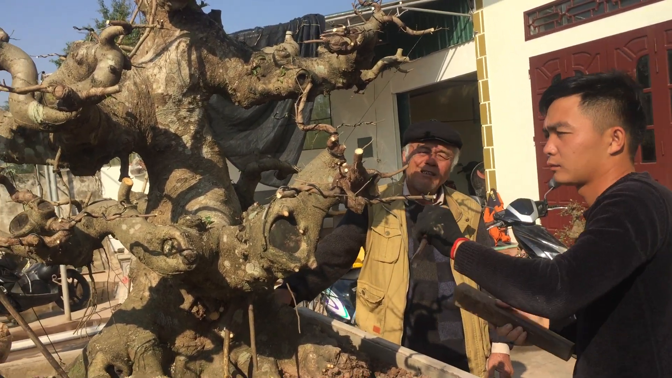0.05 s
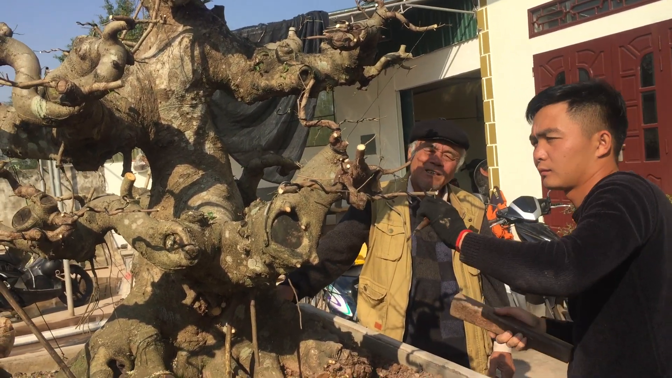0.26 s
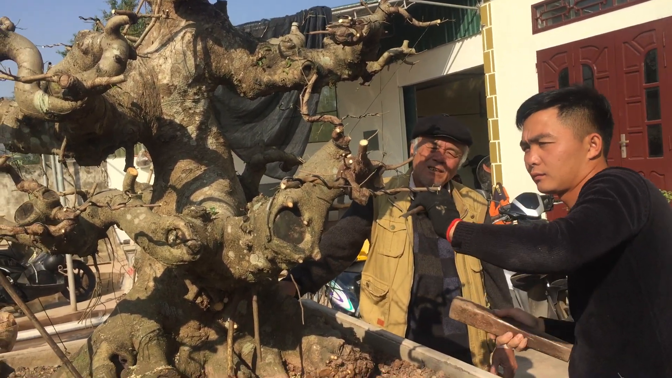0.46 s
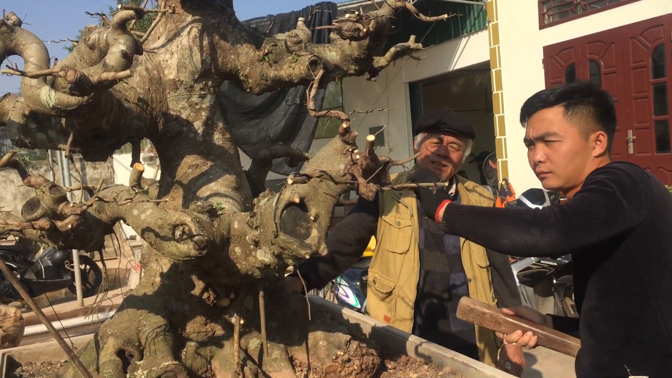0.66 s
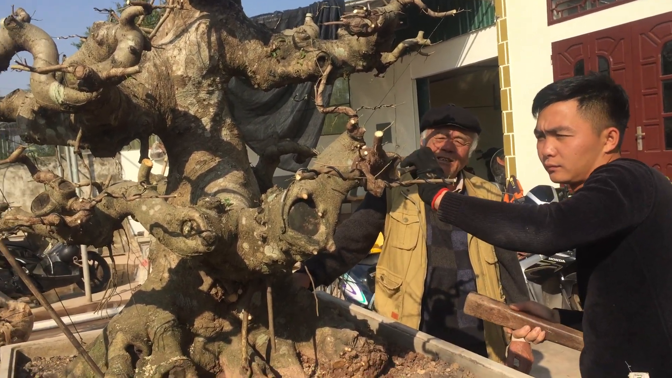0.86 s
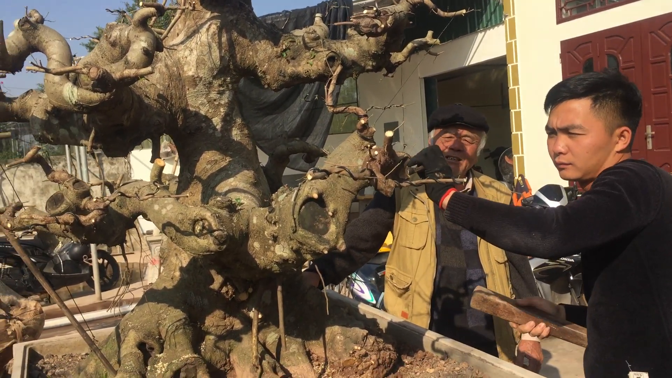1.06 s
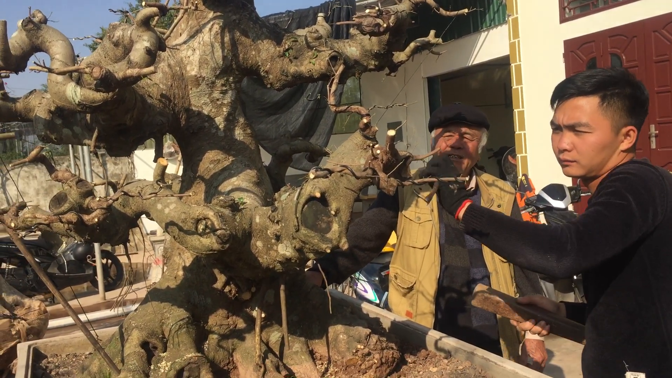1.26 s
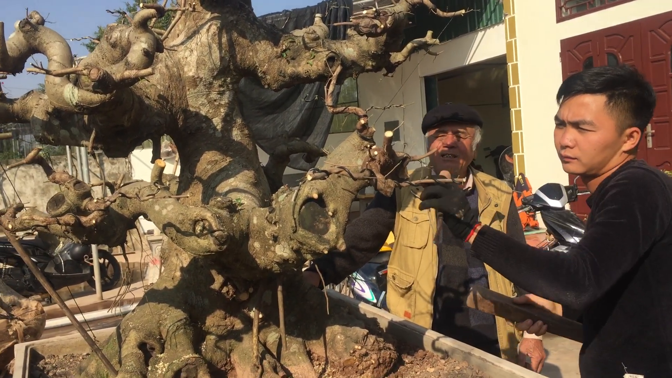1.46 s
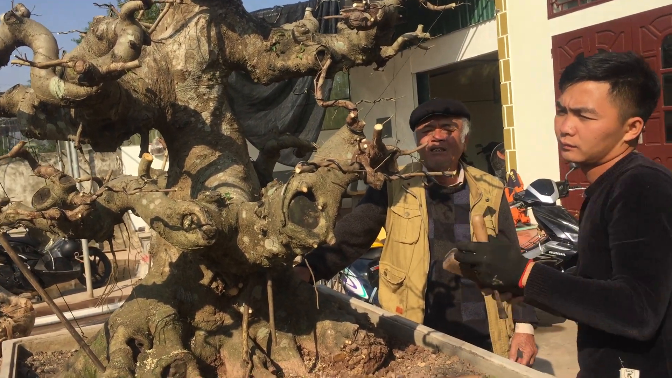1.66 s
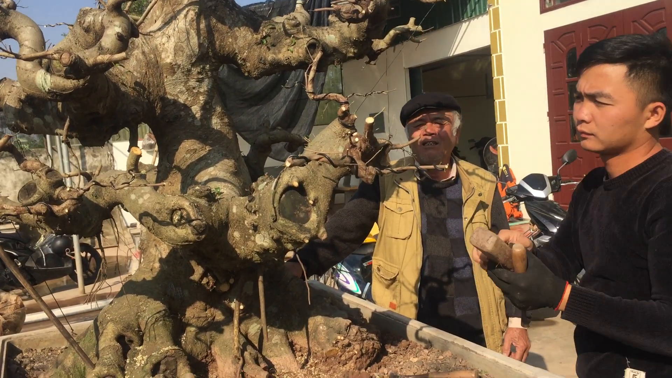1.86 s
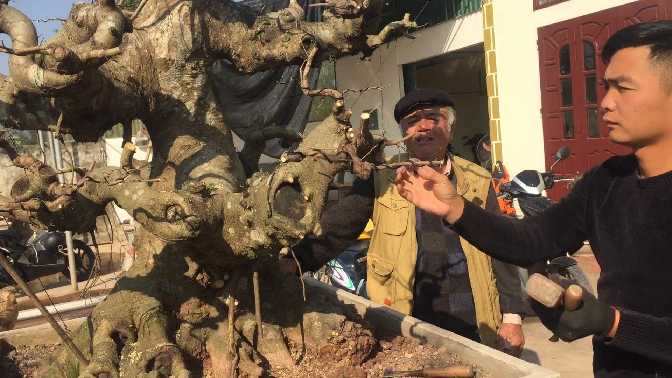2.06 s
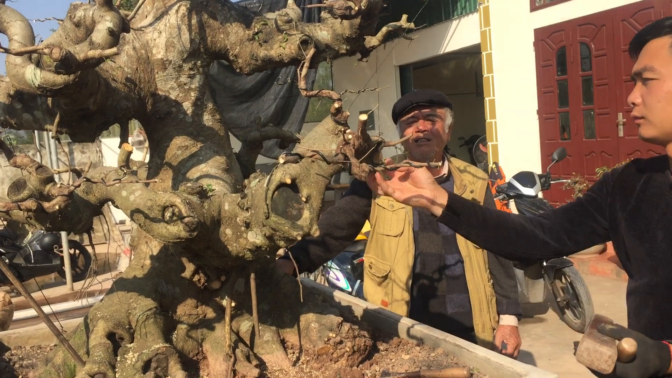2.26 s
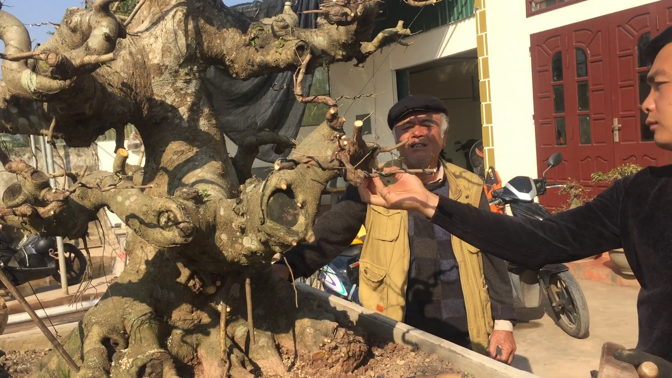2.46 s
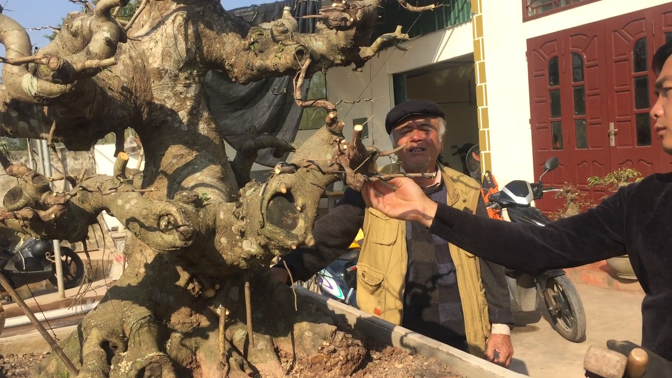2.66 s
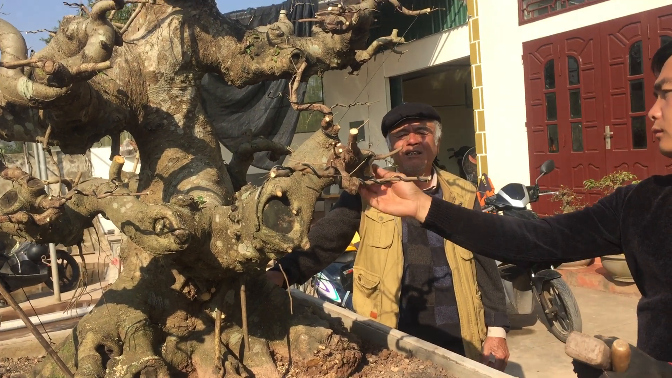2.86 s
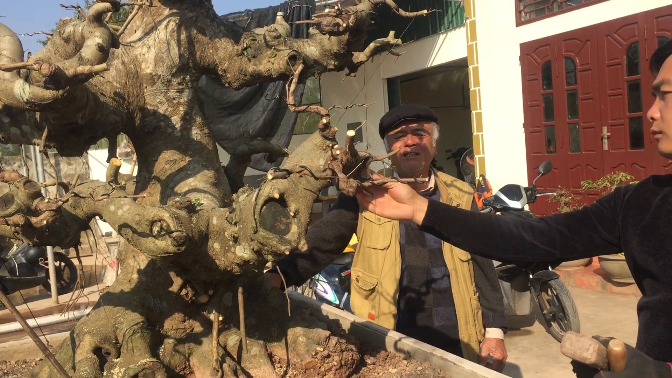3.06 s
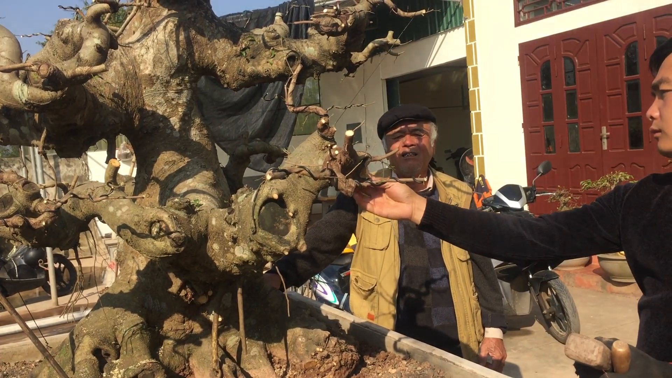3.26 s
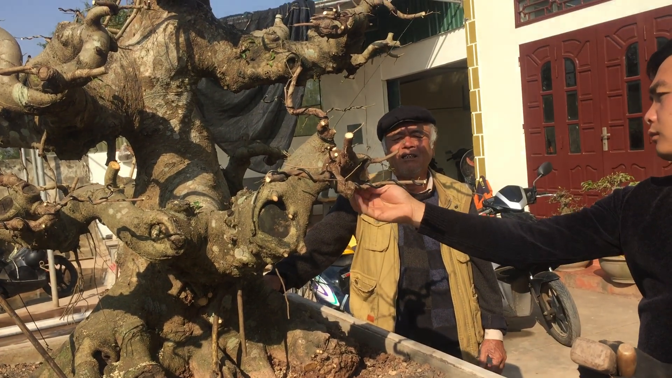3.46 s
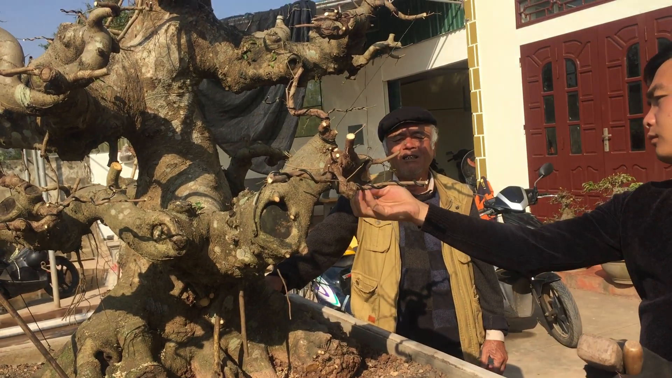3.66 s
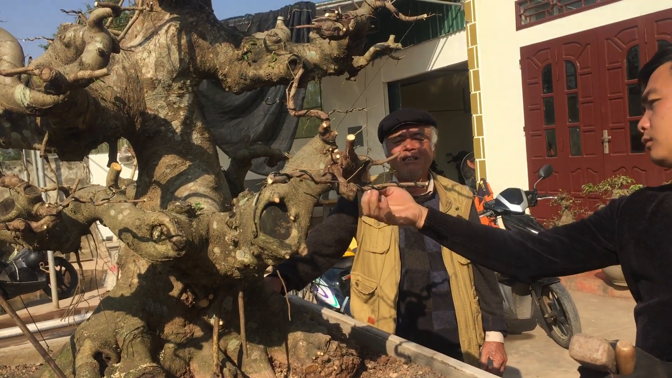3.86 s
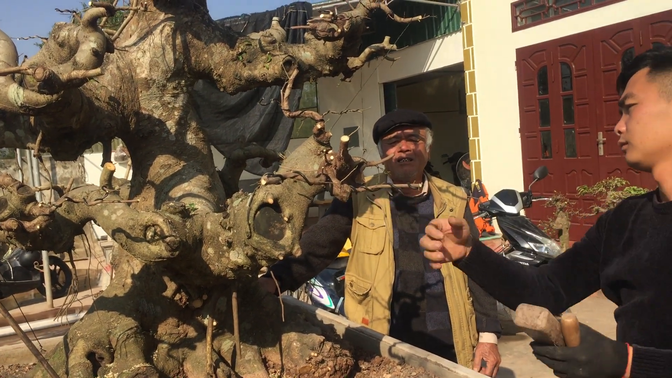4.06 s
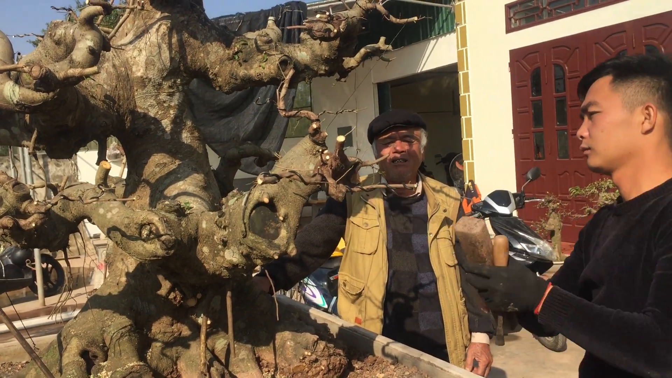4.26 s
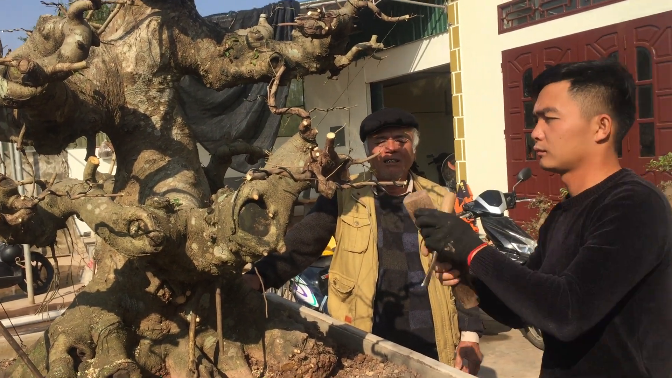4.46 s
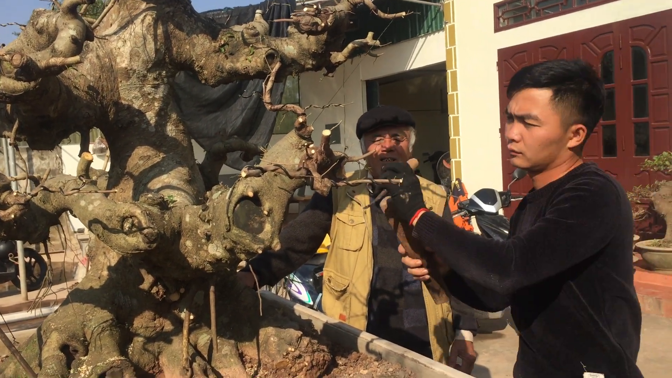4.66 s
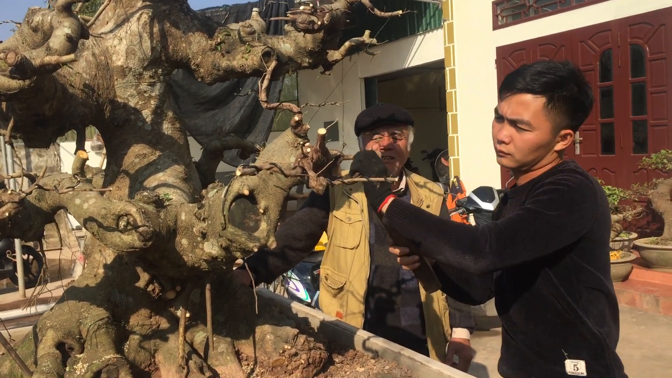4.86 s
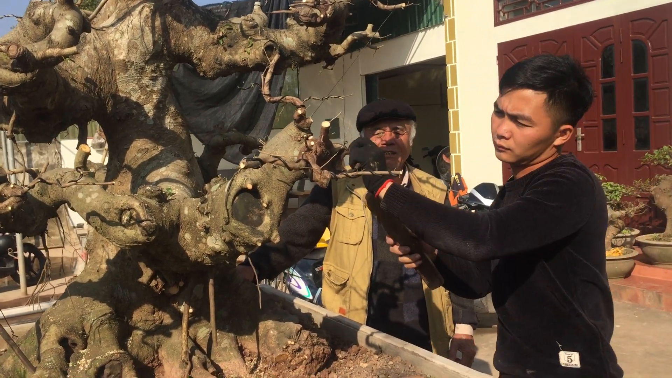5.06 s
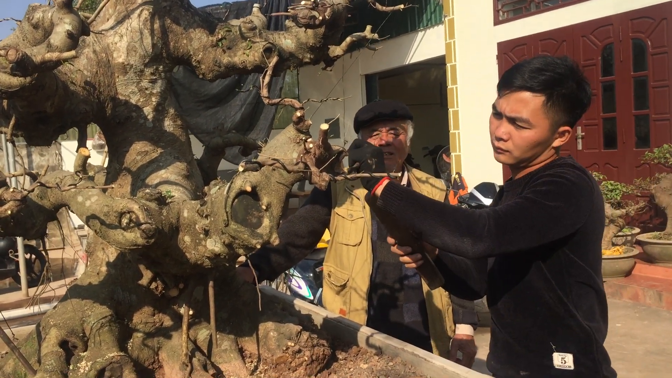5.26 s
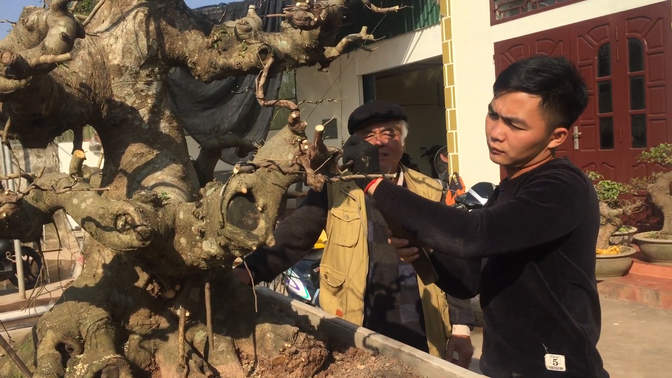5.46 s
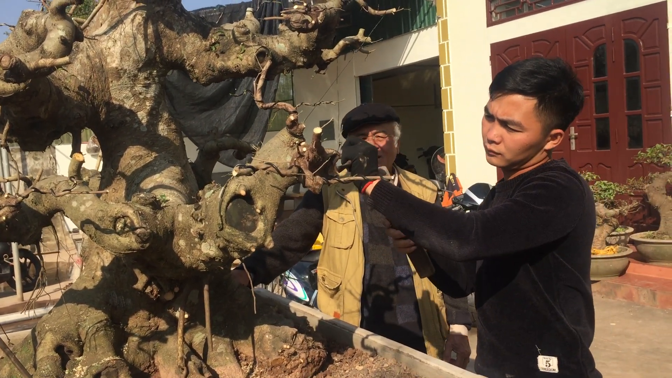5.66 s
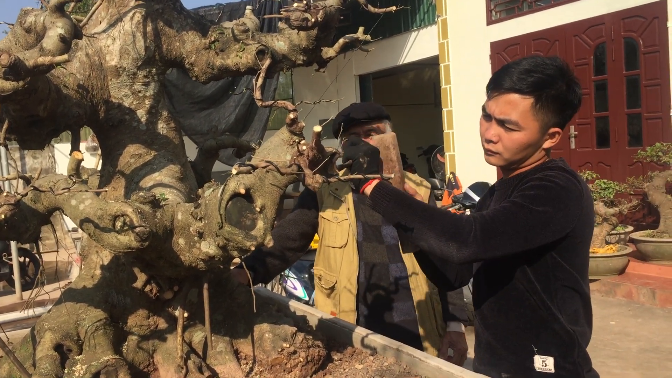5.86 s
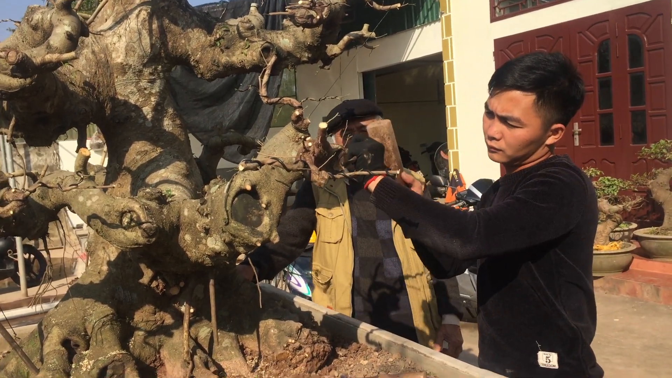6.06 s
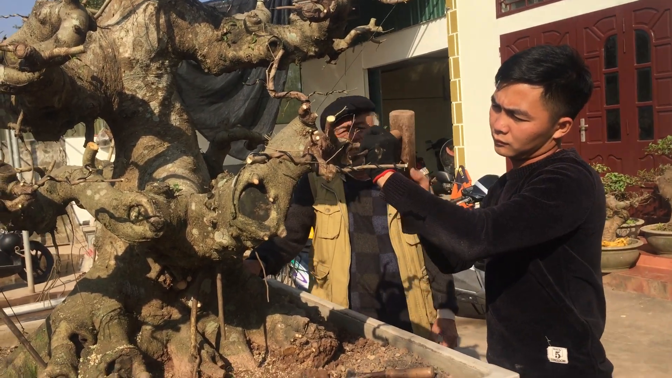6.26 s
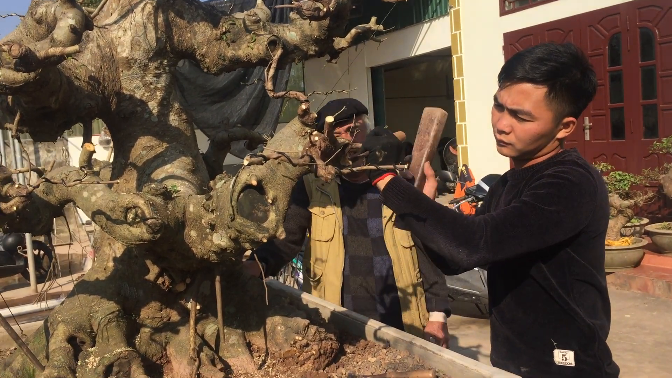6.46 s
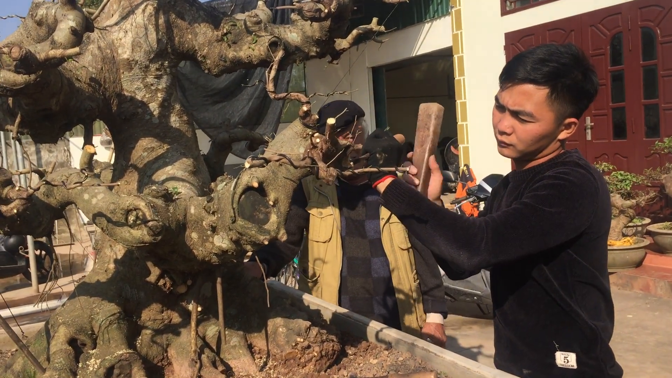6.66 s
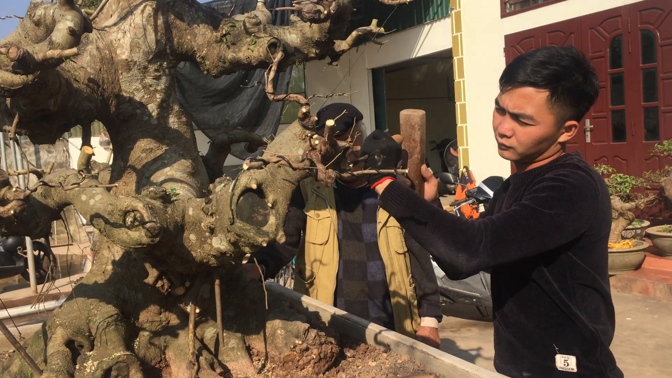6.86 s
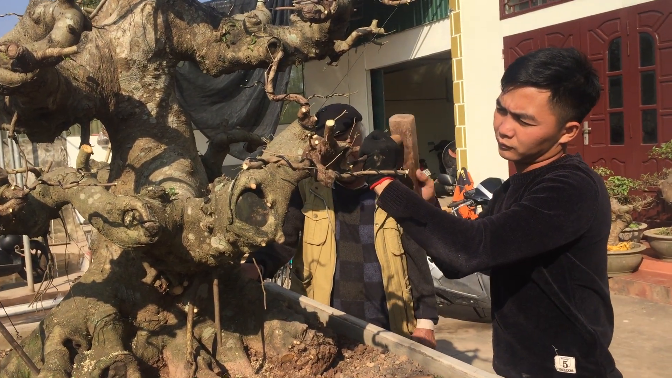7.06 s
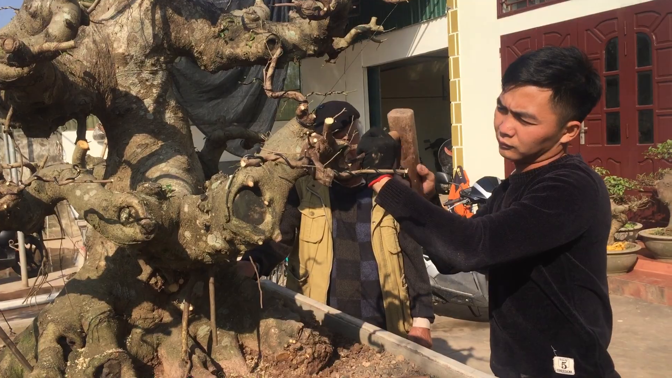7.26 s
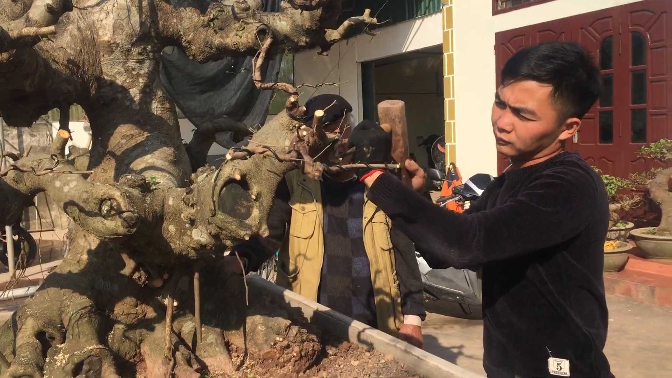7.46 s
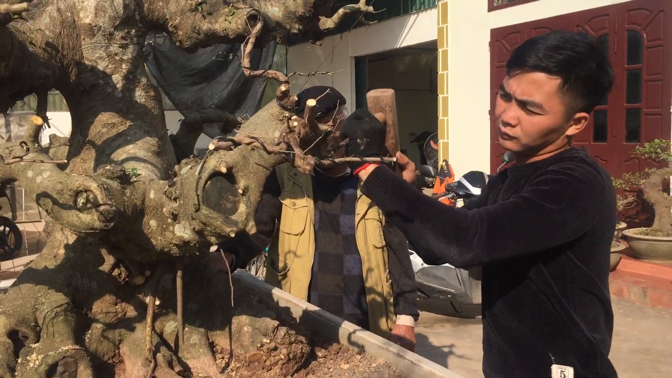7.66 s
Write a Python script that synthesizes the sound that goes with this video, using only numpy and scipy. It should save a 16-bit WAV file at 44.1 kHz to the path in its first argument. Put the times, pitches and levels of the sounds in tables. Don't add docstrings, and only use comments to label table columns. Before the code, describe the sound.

In a quiet paved yard, sleeves rustle and hands rub bark with tiny ticks and soft thuds, while a far bird peeps faintly. Mallet and chisel clack together once early on. More handling and faint wood squeaks follow, then near quiet, then seven sharp, dry wooden knocks in steady quick succession, the first softer. A small close microphone catches short wall echoes.

```python
import sys
import numpy as np
from scipy import signal
from scipy.fft import rfft, irfft
from scipy.io import wavfile
from scipy.ndimage import uniform_filter1d

SR = 44100
rng = np.random.default_rng(int(sys.argv[2]) if len(sys.argv) > 2 else 0)


def waveform_to_disk(signal):
    frames = np.transpose(np.atleast_2d(signal))
    scaled = np.clip(frames, -1, 1) * 32767
    samples = np.round(scaled).astype(np.int16)
    wavfile.write(sys.argv[1], SR, samples)


def volts(x):
    e = np.asarray(x, float) / 20
    return 10 ** e


N = 340143

# frequency in Hz, density in dB per Hz.
AIR_SPECTRUM = [(30, -7), (55, 4.5), (147, -7), (450, -9), (2700, -16), (11500, -24.5), (15200, -34),
                (16500, -43)]
# firmest moment in s, rise in s, fall in s, level in dB,
# level of the thin wood over the thick in dB.
RUBS = [(.172, 0.12, 0.24, -67.5, 9), (.408, 0.016, 0.19, -70.5, 14), (.572, 0.06, 0.075, -61.5, 4),
        (.844, 0.29, 0.18, -73.5, 6), (.97, 0.17, 0.22, -72, 3), (1.164, 0.058, 0.14, -67, 10),
        (1.436, 0.19, 0.48, -79, 8), (1.83, 0.26, 0.2, -65, -1), (1.885, 0.022, 0.1, -51.5, -1),
        (2.026, .007, 0.24, -68.5, 5), (2.235, 0.031, 0.055, -60.5, -0.5), (2.53, 0.01, 0.055, -55, -7),
        (2.58, 0.15, 0.084, -66, 9), (2.81, 0.026, 0.12, -61.5, 1.5), (3.24, 0.084, 0.056, -69, -6),
        (3.89, 0.13, 0.068, -55.5, 4), (4.03, 0.055, 0.13, -60, 4), (4.21, 0.19, 0.075, -56.5, -5.5),
        (4.5, 0.074, 0.12, -60.5, -6), (4.7, .04, 0.46, -74, 7), (4.84, 0.043, 0.33, -67.5, 5),
        (5.37, 0.068, 0.14, -75, 20), (5.7, 0.059, 0.19, -75, 19), (5.81, 0.12, 0.12, -78, -4)]
# firmest moment in s, rise in s, fall in s, level in dB,
# level of the finest grain over the coarser in dB.
RUSTLES = [(.005, 0.028, 0.74, -71, 1), (.172, 0.065, 0.16, -60, -1), (.408, 0.069, 0.17, -62.5, 0),
           (.666, 0.066, 0.13, -79.5, 14), (.754, .11, 0.093, -74.5, -13), (1.002, 0.03, 0.12, -72, -15),
           (1.2, .1, 0.18, -66.5, -5), (1.364, .3, 0.081, -71.5, 4), (1.752, 0.38, 0.47, -67, -3.5),
           (1.885, 0.032, 0.024, -66, 2), (2.026, 0.0091, 0.03, -55, -2), (2.24, 0.02, .04, -70, 11),
           (2.33, 0.098, 0.37, -75, 7), (2.53, 0.05, 0.16, -65, -1), (2.81, 0.1, 0.14, -64.5, 3.5),
           (3.22, 0.037, 0.054, -68.5, 15), (3.37, .13, 0.13, -69.5, 3), (3.89, 0.15, 0.069, -59.5, -12),
           (4.03, 0.082, 0.21, -69.5, -9), (4.21, 0.33, 0.071, -72, -7), (4.5, .16, 0.2, -69, -1),
           (4.7, 0.081, 0.34, -71, -4), (4.84, 0.067, 0.25, -61, -5.5), (5.72, 0.15, 0.36, -72.5, 6)]
# the eight pitches of one register in Hz, low register first.
RUBBED_PITCHES = [(1108, 1400, 1300, 1450, 1500, 1800, 1900, 2400),
                  (2814, 2560, 3400, 3300, 3000, 3760, 3600, 3900),
                  (4680, 5280, 6300, 6500, 5460, 4240, 4800, 6870),
                  (7460, 8300, 10300, 9150, 10000, 8940, 10640, 12600)]
RESTING_TOUCH_DB = (-78.5, -115, -82, -79)
# start in s, peak in dB, pitch in Hz,
# length of ring in cycles.
TICKS = [(0.1422, -40, 3620, 42), (0.408, -44, 3060, 9.8), (0.9944, -46, 3350, 7.1),
         (1.1448, -44.5, 4000, 8.7), (1.496, -48.5, 3280, 14), (1.634, -47, 3260, 11),
         (1.7799, -52, 3230, 8.5), (1.8094, -38, 3620, 14), (1.825, -40, 3630, 8.5),
         (2.0242, -40.5, 3250, 11), (2.0284, -49, 3300, 12), (2.2159, -57, 2840, 11),
         (2.5296, -44, 2900, 11), (2.5488, -36.5, 2920, 25), (2.802, -46, 3840, 8.5),
         (3.223, -48, 2290, 6.8), (4.6823, -42, 3870, 13), (4.7254, -43, 4060, 1.5),
         (4.836, -36.5, 4270, 16), (4.9353, -48, 3370, 8.5), (5.3208, -46.5, 4070, 16),
         (5.4919, -50, 5010, 14), (1.297, -50, 1800, 6.6), (.165, -45, 3900, 44), (.19, -43, 3680, 40),
         (1.125, -56, 3880, 40), (1.175, -47, 3880, 30), (4.783, -50, 3700, 8), (4.465, -65, 5770, 90),
         (2.222, -51, 1500, 8),
         (1.898, -41, 5340, 6.5),
    (1.907, -41, 5450, 5.3),
    (2.3136, -44.5, 11100, 9.7),
    (4.8365, -32.5, 6400, 3.8),
    (5.792, -45.5, 7400, 2.4),
    (1.029, -46, 6300, 12),
    (1.252, -45, 6750, 5.4),
    (1.325, -47.5, 7500, 8),
    (3.691, -47, 6400, 4.3),
]
# start in s, peak in dB, #
# pitch in Hz, length of ring in cycles.
THUDS = [(0.567, -35, 251, 19), (0.584, -34.5, 217, 12), (0.636, -49, 272, 10), (0.653, -59, 242, 12.5),
         (2.796, -54, 348, 28), (3.229, -53, 600, 36), (4.199, -53.5, 360, 24), (4.373, -61, 119, 8.5),
         (4.395, -53.5, 135, 8), (5.519, -58.5, 225, 37), (6.009, -50.5, 196, 11), (.41, -57, 93, 9.9),
         (.46, -66, 76.6, 9), (2.45, -58, 427, 31), (3.21, -48.5, 610, 19), (3.25, -52.5, 467, 28),
         (3.585, -58, 380, 25), (3.875, -55, 418, 32), (4.225, -50.5, 375, 19), (4.16, -55, 90, 10)]
# start in s, peak in dB, pitch in Hz, length of ring in cycles.
FLECKS = [
    (1.902, -50, 600, 12),
    (2.216, -51, 1450, 9),
    (3.878, -49, 2900, 40),
    (6.247, -58, 8500, 9),
    (6.405, -55, 9500, 9),
    (6.409, -57, 8000, 9),
    (6.581, -60, 9000, 9),
    (6.602, -56, 8300, 9),
    (6.612, -58, 9800, 14),
    (6.89, -53, 3500, 9),
]
# frequency in Hz, gain in dB.
YARD_COLOUR = [(45, 7), (200, 8.5), (350, 0), (600, -3), (1500, -0.5), (5000, -3.5), (9000, -8.5),
               (16000, -26)]
# start in s, length in s, pitch in Hz, level in dB.
PEEPS = [(0.581, 0.058, 3350, -71.5), (0.931, 0.054, 1710, -67.5), (0.959, 0.13, 3350, -65.5),
         (1.407, 0.13, 3330, -74), (1.467, 0.053, 3880, -78), (1.494, 0.027, 1304, -75),
         (1.561, 0.031, 1264, -72), (1.928, 0.098, 3170, -68), (2.03, 0.081, 1450, -69.5),
         (1.82, 0.035, 1460, -72), (2.345, .09, 3200, -79)]
# start in s, peak in dB.
CLACKS = [
    (1.89, -8.5),
]
# frequency in Hz, level in dB, decay time t60 in s.
TOOL_MODES = [(790, -12.5, 0.02), (1090, -13.5, 0.028), (1230, -4.5, 0.059), (1500, -6, 0.012),
              (1780, -1, 0.079), (1990, -0.5, 0.011), (2400, -5.5, 0.028), (2680, -7, 0.018),
              (3350, -12, 0.014), (4000, -9, 0.035), (4840, -11, 0.0063), (5800, -15, 0.0044)]
# start in s, length in s, pitch in Hz, level in dB.
SQUEAKS = [(3.815, .025, 3850, -73), (3.875, .05, 2150, -67), (4.01, .05, 5270, -74),
           (4.02, .08, 1950, -73), (4.025, .045, 3000, -69), (4.03, .07, 1400, -73),
           (4.045, .06, 3780, -74), (4.115, .04, 5450, -75), (4.155, .09, 2250, -71),
           (4.17, .098, 1150, -69), (4.46, .035, 5800, -73), (4.488, .045, 2760, -68),
           (6.0, .098, 860, -74)]
# start in s, peak in dB, then head, steel and trunk in dB against the handle modes.
BLOWS = [
    (6.1749, -17.5, -7.5, -14.5, -25.5),
    (6.4221, -15, -10, -9.5, -17),
    (6.658, -11, -16.5, -10, -16.5),
    (6.9125, -9.5, -12, -8, -16),
    (7.1395, -9.5, -15, -10.5, -16.5),
    (7.356, -9.5, -38, -6, -12.5),
    (7.5745, -9.5, -15, -5, -16),
]
# grip pitch in Hz, handle pitch in Hz, then grip, neck and split fibres in dB.
LANDINGS = [
    (1110, 1560, 1.6, -10, -18),
    (1060, 1760, 4.5, -17, -7.5),
    (925, 1655, -0.8, -17, -8),
    (963, 1690, 1.2, -6, 0.2),
    (990, 1700, -1.2, -22, -7),
    (1037, 1990, 6, 0.5, 1.7),
    (913, 1430, 0, -16, -0.2),
]
# delay of the kick in s, signed share of the blow, paving echo in dB.
KICKS = [
    (.0026, .1, -3),
    (.0026, .25, -7),
    (.0031, -.3, -6),
    (.0026, .35, -7),
    (.00245, .35, -8),
    (.0029, .3, -8),
    (.00256, -.3, -9),
]
# frequency in Hz, level in dB, decay time t60 in s.
HEAD_MODES = [(503, -17, 0.0085), (573, -1.5, 0.021), (594, 4, 0.017), (706, -4.5, 0.021)]
# frequency in Hz, level in dB, decay time t60 in s.
HANDLE_MODES = [(1450, -14, 0.035), (1598, 4, 0.014), (1710, 3.5, 0.024), (1742, 6, 0.024),
                (1970, 1, 0.0076), (2120, -13, 0.049)]
# frequency in Hz, level in dB, decay time t60 in s.
GRIP_MODES = [(990, 6, 0.012), (967, -4.5, 0.025), (1010, 0.5, 0.0068)]
# frequency in Hz, level in dB, decay time t60 in s.
NECK_MODES = [(1377, 5.5, 0.0088), (1350, -12, 0.012)]
# frequency in Hz, level in dB, decay time t60 in s.
STEEL_MODES = [(2185, 3, 0.01), (2490, 6, 0.0065), (2872, -8, 0.029), (2996, -3, 0.021), (3350, 9, 0.0068),
               (3796, -0.5, 0.016), (3990, -3.5, 0.0086), (4750, 1.5, 0.0043), (5500, -3, 0.01),
               (6560, -7, 0.0048)]
# frequency in Hz, level in dB, decay time t60 in s.
TRUNK_MODES = [(76.5, -15, 0.11), (103, -4, 0.06), (128.3, -5, 0.066), (159, -8.5, 0.052), (219, -3, 0.043),
               (294, 0, 0.038), (366, -7.5, 0.042)]
# frequency in Hz, width in Hz, gain in dB.
MICROPHONE_PORT = [(4000, 1000, 1.5), (4770, 1260, -4), (10300, 720, -8)]


def rms_one(x):
    return x / np.sqrt(np.mean(x ** 2) + 1e-20)


def peak_one(x):
    return x / np.abs(x).max()


def coloured(x, points):
    hz, level_db = np.transpose(points)
    grid = np.arange(len(x) // 2 + 1) * SR / len(x) + 1
    gain = volts(np.interp(np.log(grid), np.log(hz), level_db))
    return irfft(rfft(x) * gain, len(x))


def above(x, hz):
    return signal.sosfilt(signal.butter(4, hz, "high", fs=SR, output="sos"), x)


def ring(force, hz, t60):
    r = volts(-60 / (t60 * SR))
    w = 2 * np.pi * hz / SR
    return signal.lfilter([0, np.sin(w)], [1, -2 * r * np.cos(w), r * r], force + 1e-18)


def add(out, s, sound):
    i = round(s * SR)
    out[i:i + len(sound)] += sound[:N - i]


def air():
    level_db, breathing_db = -63, .7
    slow = rms_one(uniform_filter1d(rng.standard_normal(N), size=9000))
    return volts(level_db + breathing_db * slow) * rms_one(coloured(rng.standard_normal(N), AIR_SPECTRUM))


def strokes(rows):
    fall_db = 20
    blunt = 1.22
    t, power = np.arange(N // 40 + 2) * 40 / SR, 0
    for s, rise, fall, level_db, tilt_db in rows:
        shape_db = level_db - fall_db * np.maximum((s - t) / rise, (t - s) / fall) ** blunt
        power = power + volts(2 * (shape_db + tilt_db * np.array([[-.5], [.5]])))
    return [np.interp(np.arange(N) / SR, t, p) for p in power]


def brushing(per_s, size_db, cycles):
    sizes = volts(size_db * np.minimum(rng.exponential(1, N), 5)) * rng.choice([-1, 1], N)
    grains = sizes * (rng.random(N) < per_s / SR)
    dealt = rng.integers(0, 32, N)
    powers = strokes(RUBS) + strokes(RUSTLES)
    t, out = np.arange(N) / SR, np.zeros(N)
    for k, pitches in enumerate(RUBBED_PITCHES):
        touch_db = 6.7 * rng.standard_normal((len(pitches), 80))
        rings = np.zeros(N)
        for j, hz in enumerate(pitches):
            touch = volts(np.interp(t * 10, np.arange(80), touch_db[j]))
            rings += ring(grains * (dealt == 8 * k + j) * touch, hz, cycles[k] / hz)
        rings = above(rings, pitches[0] * .45)
        even = np.sqrt(uniform_filter1d(rings ** 2, size=6000) + 1e-12)
        out += np.sqrt(powers[k] + volts(2 * RESTING_TOUCH_DB[k])) * rings / even
    return out


def small_knocks(rows, trim_db, scratch, overtones):
    out, t = np.zeros(N), np.arange(SR // 5) / SR
    for s, peak_db, hz, cycles in rows:
        touch = (t == 0) + scratch * rng.standard_normal(len(t)) * np.exp(-t / 0.0068)
        rings = sum(share * ring(touch, min(hz * ratio, 15000), cycles / hz) for ratio, share in overtones)
        add(out, s, volts(peak_db + trim_db) * peak_one(above(rings, hz * 0.6)))
    return out


def ticks():
    overtones = ((1.04, 1), (1.1, 0.061), (1.11, 0.28), (1.86, 0.26), (2.73, 0.13))
    return small_knocks(TICKS, -3.9, 0.46, overtones)


def thuds():
    overtones = ((1, 0.9), (1.3, 0.39), (2.2, 0.059), (2.8, 0.15), (4.1, 0.16))
    return small_knocks(THUDS, -0.66, 0.029, overtones)


def yard(x):
    arrive_s, full_s, hold_s = 0.0091, 0.021, 0.022
    t = np.arange(round(.6 * SR)) / SR
    swelling_db = 454 * np.maximum(full_s - t, 0)
    dying_db = 209 * np.maximum(t - full_s - hold_s, 0)
    near_walls = volts(-17 - swelling_db - dying_db)
    far_walls = volts(-39 - 9.5 * t)
    shape = np.hypot(near_walls, far_walls) * np.minimum(t / arrive_s, 1) ** 4.7
    lumps = volts(1.36 * rms_one(uniform_filter1d(rng.standard_normal(len(t)), size=120)))
    response = coloured(rng.standard_normal(len(t)) * lumps, YARD_COLOUR) * shape * volts(-28.5)
    return signal.fftconvolve(x, response)[:N]


def whistles(rows):
    scoop, scoop_s = 0.145, 0.0116
    out = np.zeros(N)
    for s, length, hz, level_db in rows:
        t = np.arange(round(length * SR)) / SR
        shiver = [rms_one(uniform_filter1d(v, size=300)) for v in rng.standard_normal((2, len(t)))]
        pitch = hz * (1 + 0.008 * shiver[0] - scoop * (length > .1) * np.exp(-t / scoop_s))
        tone = np.sin(2 * np.pi * np.cumsum(pitch) / SR) * volts(4.3 * shiver[1])
        add(out, s, volts(level_db + 5.0) * np.sin(np.pi * t / length) ** 0.25 * tone)
    return out


def clack():
    out, click = np.zeros(N), np.eye(1, SR // 4)[0]
    rebound = click + 0.1 * np.roll(click, round(0.0026 * SR))
    touch = signal.lfilter([.16], [1, -1.2, .36], rebound)
    for s, peak_db in CLACKS:
        rings = sum(volts(d) * ring(touch, hz, t60) * (-1) ** k for k, (hz, d, t60) in enumerate(TOOL_MODES))
        add(out, s - .0009, volts(peak_db - 5.0) * peak_one(above(rings, 810)))
    return out


def struck(force, modes, spread_db, detune, pitch=1):
    out = 0
    for k, (hz, level_db, t60) in enumerate(modes):
        a, b = rng.standard_normal(2)
        out = out + volts(level_db + spread_db * a) * (-1) ** k * ring(force, hz * (pitch + detune * b), t60)
    return out


def contact(kick_s, kick_share):
    force = np.zeros((2, round(.3 * SR)))
    force[0, 0] = 0.0093
    force[:, round(.0006 * SR)] = 1
    gap, sign, size = rng.standard_normal((3, 8))
    slips_s = 0.00095 + np.cumsum(0.00098 * np.exp(.5001 * gap))
    force[0, (slips_s * SR).astype(int)] += 0.18 * np.exp(-slips_s / 0.005 + 0.16 * size) * np.sign(sign)
    force[0, round((.0006 + kick_s) * SR)] += kick_share
    return signal.lfilter([.36], [1, -.8, .16], force)


def split_fibres(length, peak_db):
    after = np.maximum(np.arange(length) / SR - .0006, 0)
    dying = np.exp(-after / 0.0014) + 0.12 * np.exp(-after / 0.012)
    fibres = above(rng.standard_normal(length), 3600) * (after > 0) * dying
    top_hz = min(11000 * volts(0.093 * (peak_db - 7.0)), 19000)
    return signal.sosfilt(signal.butter(2, top_hz, fs=SR, output="sos"), fibres)


def blow(peak_db, head_db, steel_db, trunk_db, landing, kicks):
    grip_hz, handle_hz, grip_db, neck_db, fibres_db = landing
    kick_s, kick_share, paving_db = kicks
    force = contact(kick_s, kick_share)
    push = signal.lfilter([.02], [1, -1.9, .9025], force[[1, 1]])
    body = struck(force, HANDLE_MODES, 0.59, 0.01, handle_hz / HANDLE_MODES[2][0])
    body -= volts(head_db + 6.5) * struck(force, HEAD_MODES, 0.093, 0.082)
    body += volts(grip_db) * struck(force, GRIP_MODES, 0.88, 0.0058, grip_hz / GRIP_MODES[0][0])
    body -= volts(neck_db + 1.0) * struck(force, NECK_MODES, 1.0, 0.023)
    body += volts(steel_db + 8.5) * struck(force, STEEL_MODES, 1.0, 0.0066)
    trunk = above(struck(push, TRUNK_MODES, 0.28, 0.061), 48)
    body = above(body, 445) + volts(trunk_db - 7.0) * trunk
    paving = volts(paving_db) * np.roll(body[0], round(.0051 * SR))
    wall = volts(-18) * np.roll(body[0], round(.0113 * SR))
    body[0] += paving + wall
    body += volts(fibres_db) * split_fibres(force.shape[1], peak_db)
    return body / np.sqrt(np.sum(body ** 2, axis=1, keepdims=True))


def mallet():
    out = np.zeros((2, N))
    for (s, peak_db, *colour), landing, kicks in zip(BLOWS, LANDINGS, KICKS):
        direct, around = volts(peak_db + 26) * blow(peak_db, *colour, landing, kicks)
        add(out[0], s - .0008, direct)
        add(out[1], s, around)
    return out


def scene():
    touch = brushing(per_s=9000., size_db=1.5, cycles=(60.0, 64.6, 44.7, 30.))
    hands, dull = ticks() + clack(), thuds()
    direct, around = mallet()
    echoes = yard(around + volts(-5) * hands + volts(-7) * dull)
    flecks = small_knocks(FLECKS, 0.76, 0.6, ((1, 1), (1.9, 0.37), (2.1, 0.22), (1.1, 0.11)))
    mix = air() + touch + hands + dull + whistles(PEEPS) + whistles(SQUEAKS) + direct + echoes + flecks
    return mix[None]


def roll_off(x):
    return signal.sosfilt(signal.butter(12, 16960, fs=SR, output="sos"), x)


def record(dry):
    x = dry
    for hz, width, gain_db in MICROPHONE_PORT:
        x = x + (volts(gain_db) - 1) * signal.lfilter(*signal.iirpeak(hz, hz / width, fs=SR), x)
    x = 0.74 * np.tanh(x / 0.62)
    x = signal.sosfilt(signal.butter(2, 42, "high", fs=SR, output="sos"), x)
    x = signal.sosfilt(signal.butter(6, 16300, fs=SR, output="sos"), x)
    return roll_off(x)


dry = scene()
out = record(dry)
waveform_to_disk(out)
```